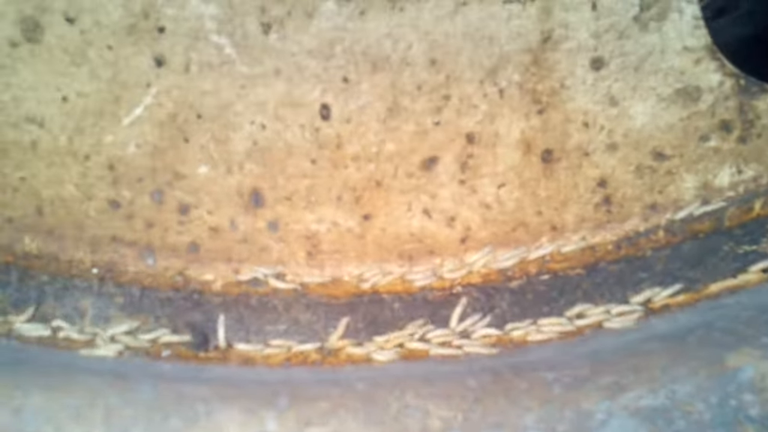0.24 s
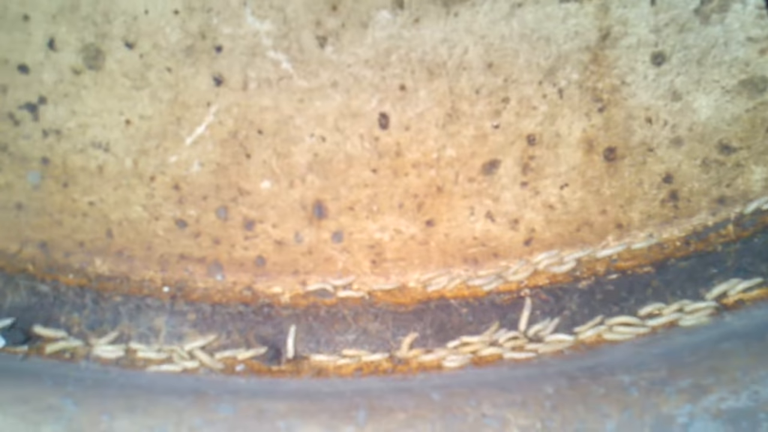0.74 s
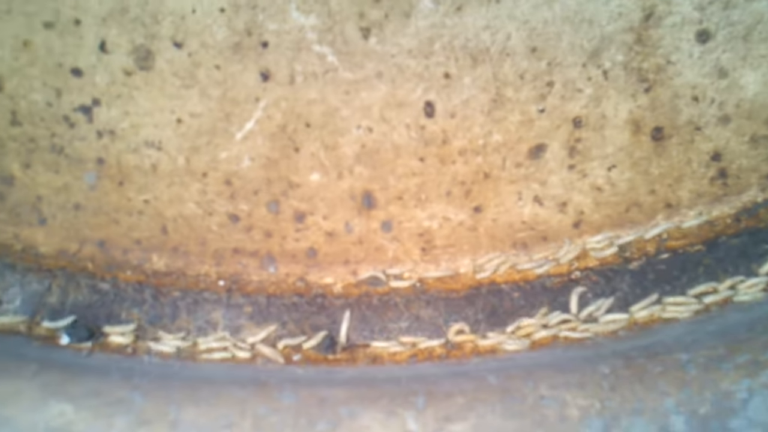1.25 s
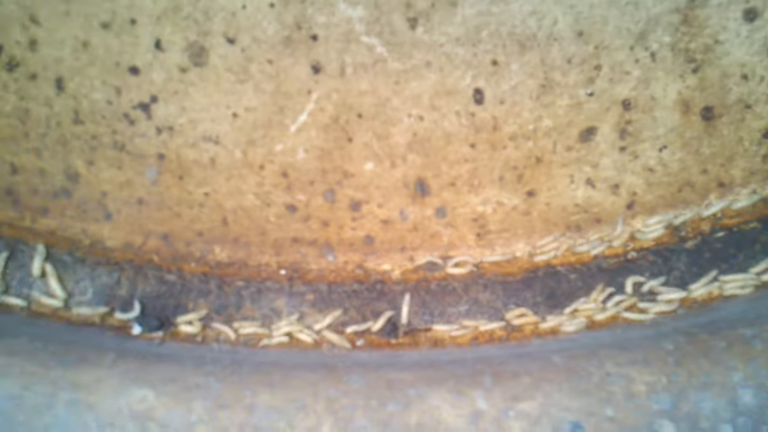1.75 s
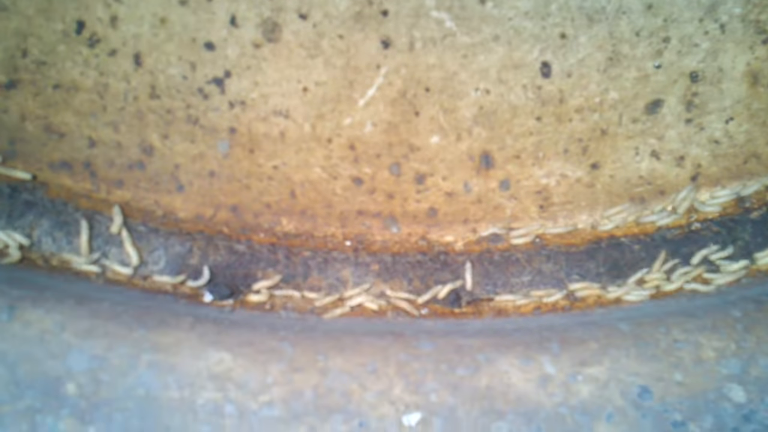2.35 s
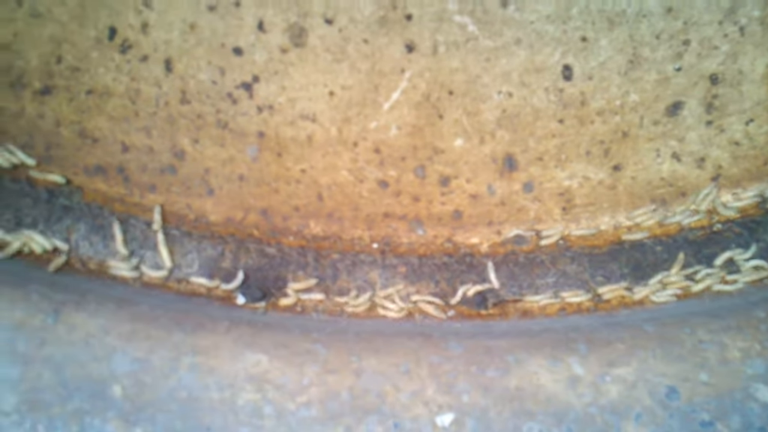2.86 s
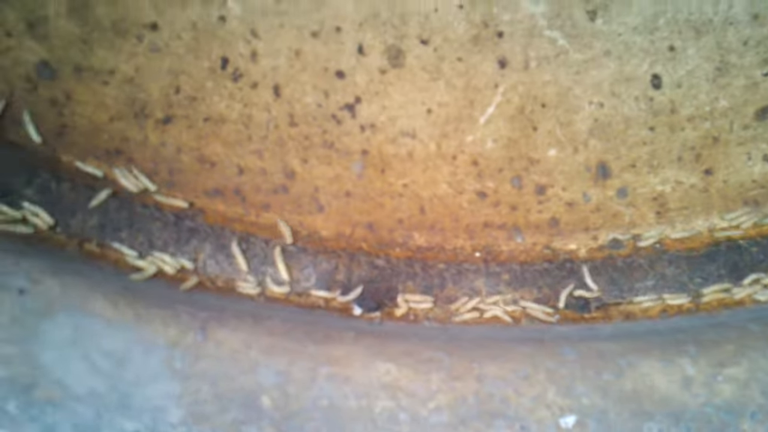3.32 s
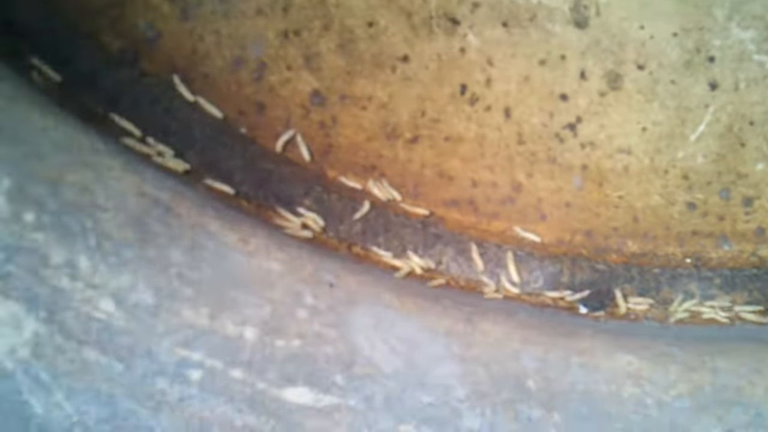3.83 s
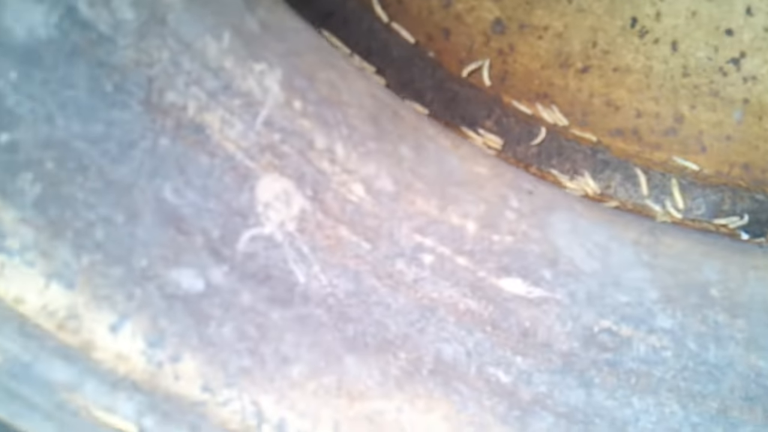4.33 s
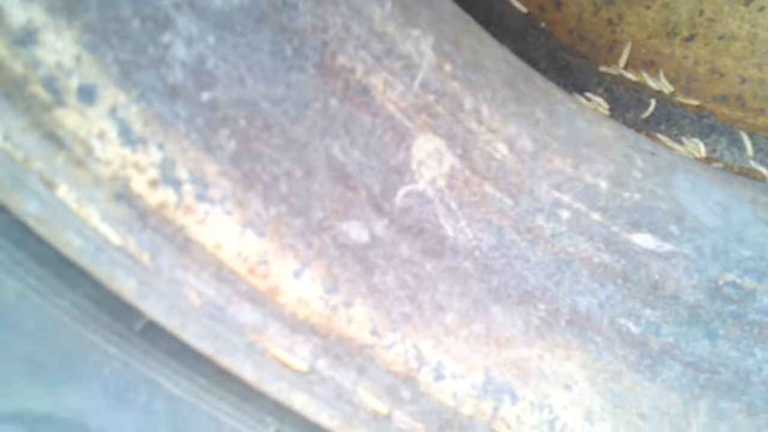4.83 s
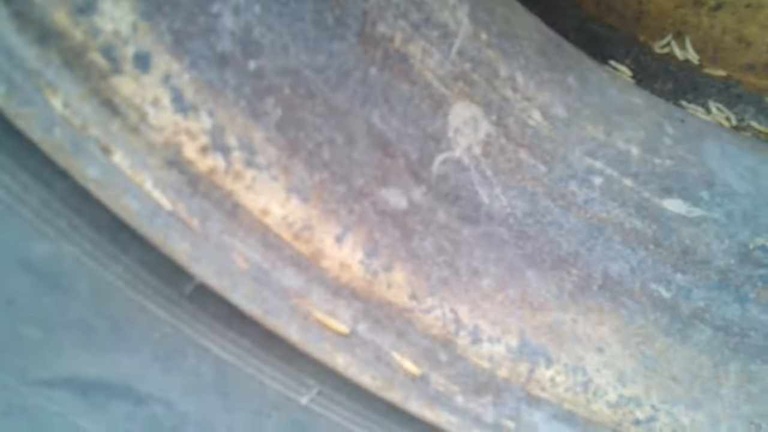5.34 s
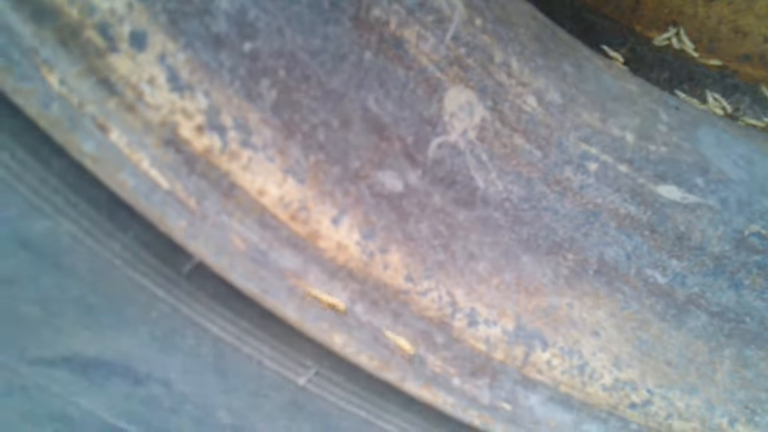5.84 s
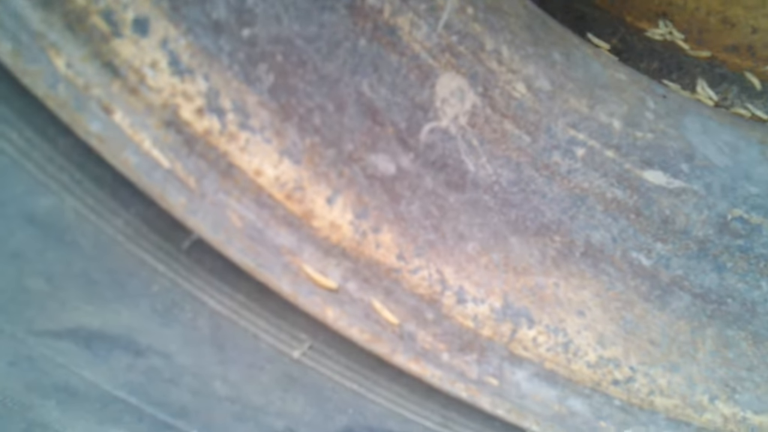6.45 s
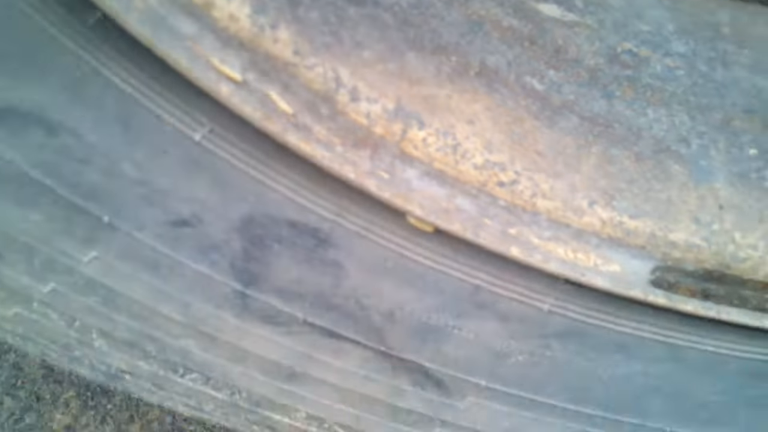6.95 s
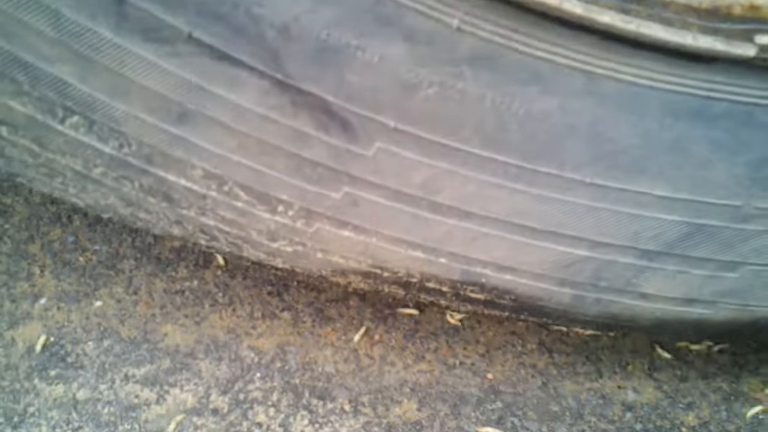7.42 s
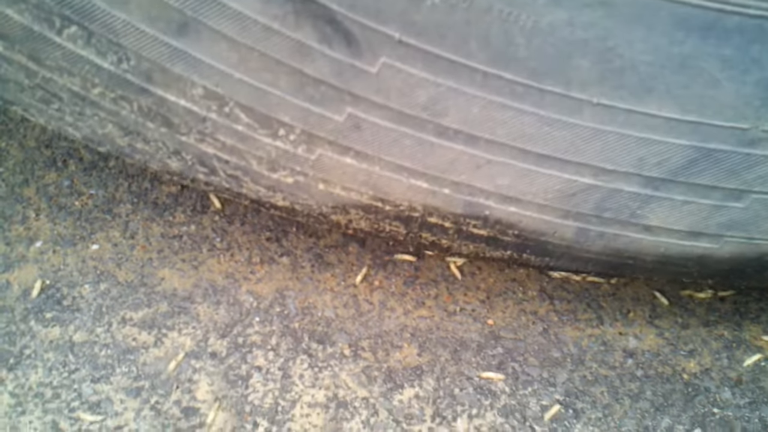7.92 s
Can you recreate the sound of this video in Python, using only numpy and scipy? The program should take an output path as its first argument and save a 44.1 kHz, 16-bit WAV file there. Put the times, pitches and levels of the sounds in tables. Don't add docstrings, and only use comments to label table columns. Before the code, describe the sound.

A large diesel engine rattles at idle outdoors; after faint air hisses and a short squeal, a thud brings in a loud, windy cooling fan roar.

```python
import sys
import numpy as np
from scipy import signal
from scipy.fft import rfft, irfft, next_fast_len
from scipy.io import wavfile
from scipy.ndimage import map_coordinates

SR = 44100
rng = np.random.default_rng(int(sys.argv[2]) if len(sys.argv) > 2 else 0)


def level_to_linear(level):
    exponent = np.asarray(level, float) / 20
    return 10 ** exponent


def bounce(signal):
    frames = np.transpose(np.atleast_2d(signal))
    limited = np.clip(frames, -1, 1)
    pcm = np.round(limited * 32767).astype(np.int16)
    wavfile.write(sys.argv[1], SR, pcm)


N = 360738

DRAG_S, GRIP_S, THUD_S = 1.115, 1.335, 1.351
# (time [s], speed [engine cycles per s])
SPEED = [
    (0, 8.295),
    (1.2, 8.292),
    (1.7, 8.27),
    (2.3, 8.35),
    (2.9, 8.325),
    (3.5, 8.305),
    (4.2, 8.298),
    (8.18, 8.295),
]


def unit(x):
    return x / np.sqrt(np.mean(x ** 2, axis=-1, keepdims=True) + 1e-20)


def along(points, hz):
    f, *cols = np.transpose(points)
    return [np.interp(np.log(hz + 1), np.log(f + 1), c) for c in cols]


def curves(rows):
    s, *cols = np.transpose(rows)
    return [np.interp(np.arange(N) / SR, s, c) for c in cols]


def since(s):
    return np.maximum(np.arange(N) / SR - s, 0)


def spin_up(s, lack_db, tau):
    return -lack_db * np.exp(-since(s) / tau)


def wobble(rate):
    return map_coordinates(rng.standard_normal(1600), [np.arange(N) * rate / SR])


def filtered(x, response):
    m = next_fast_len(N + 8192)
    return irfft(rfft(x, m) * response(np.fft.rfftfreq(m, 1 / SR)), m)[..., :N]


def above(hz, edge_hz):
    return 1 - 1 / (1 + (hz / edge_hz) ** 24)


def tone(hz, db, lag):
    phase = 2 * np.pi * np.cumsum(hz) / SR
    half = np.pi * hz * lag / SR
    return np.sqrt(2) * level_to_linear(db) * np.array([np.cos(half) * np.cos(phase), -np.sin(half) * np.sin(phase)])


def heard(pair, spectrum, waves, ports):
    def response(hz):
        db = along(spectrum, hz)[0]
        for centre, width, wave_db in waves:
            db = db + wave_db / (1 + (2 * (hz - centre) / width) ** 2)
        side_db, lead, tied = along(ports, hz)
        tied = np.clip(tied, 0, 1)
        gain = level_to_linear(db) * np.sqrt(SR / 2) * (hz > 12)
        follows = level_to_linear(side_db) * tied * np.exp(1j * lead)
        stands_alone = level_to_linear(side_db) * np.sqrt(1 - tied ** 2)
        return gain * np.array([np.ones_like(hz), follows, stands_alone])

    total, tied, loose = filtered(pair[[0, 0, 1]], response)
    return np.array([total, tied + loose])


def rattle(turn, steady):
    size, count = 8192, 500
    pattern = irfft(rfft(rng.standard_normal((2, size)))[:, :count], size)
    pattern = unit(pattern) * np.sqrt(count * 8.3 / (SR / 2))
    where = [turn % 1 * size]
    repeat = np.array([map_coordinates(p, where, order=1, mode="grid-wrap") for p in pattern])
    angle = 2 * np.pi * turn
    knock = .05 * np.cos(angle) + .04 * np.cos(2 * angle + 1) + .015 * np.cos(3 * angle)
    knock = knock + .015 * np.cos(6 * angle)
    noise = rng.standard_normal((2, N))
    noise = noise + filtered(knock * noise, lambda hz: 1 - .6 * above(hz, 3800))
    repeat = filtered(repeat, lambda hz: np.sqrt(steady(hz)))
    return repeat + filtered(noise, lambda hz: np.sqrt(1 - steady(hz)))


# (time [s], place [0 inner rim, 1 rim lip, 2 tyre wall])
DRIFT = [(0, 0), (3.0, 0.28), (3.4, 0.25), (3.7, .5), (4.0, 0.84), (4.3, .95), (4.7, 1.05), (5.5, 0.98),
         (6.2, 1.05), (6.9, 1.3), (7.15, 1.3), (7.45, 1.8), (8.18, 2.05)]


def at_place(rows):
    p, *cols = np.transpose(rows)
    return [np.interp(curves(DRIFT)[0], p, c) for c in cols]


# (time [s], level [dB])
SWELLS = [(1.72, -3), (2.2, 5), (2.64, -2), (3.1, 3.5), (3.33, -4), (3.8, 2.5), (4.15, 0), (4.42, -1),
          (4.95, -1), (5.15, 2.5), (5.65, 2.5), (6.36, 1.5), (6.9, 2.5), (7.4, 0), (8.2, 5)]
# (time [s], level lost [dB])
STALLS = [
    (1.9, 4.1),
    (2.72, 2.6),
    (3.4, 10.6),
    (4.54, 4.6),
    (5.371, 2.3),
    (6.049, 2.9),
]


def inflow_swing_db():
    t = np.arange(N) / SR
    swing = spin_up(GRIP_S, 1.6, 0.49)
    for s, db in SWELLS:
        swing = swing + db * np.exp(-((t - s) / 0.18) ** 2)
    onset_s, heal_s = 0.015, 0.13
    for s, db in STALLS:
        swing = swing - db * np.clip(since(s) / onset_s, 0, 1) * np.exp(-since(s + onset_s) / heal_s)
    return swing


# (frequency [Hz], level [dB per Hz])
ROAR = [
    [(40, -85.9), (70, -59), (105, -49), (150, -40.5), (200, -48), (260, -59), (400, -65.5), (700, -68),
     (1900, -78), (2900, -86.5), (4700, -99.6), (6500, -99), (8800, -99.9), (13900, -109.2)],
    [(40, -73), (70, -60), (105, -49.5), (150, -40), (200, -53.5), (260, -64.5), (400, -61.5), (700, -67.5),
     (1900, -73.5), (2900, -79.5), (4700, -90), (6500, -93), (8800, -93), (13900, -100.9)],
    [(40, -74.0), (70, -60), (105, -50.5), (150, -41), (200, -54.5), (260, -66.5), (400, -60.5),
     (700, -68.5), (1900, -77.5), (2900, -79.5), (4700, -92), (6500, -92), (8800, -93.5), (13900, -102.3)],
]
# (frequency [Hz], width [Hz], level [dB])
ROAR_WAVES = [
    [(338, 12, -9), (365, 18, -22), (433, 33, -3), (544, 66, -1.5), (910, 10, 3), (1300, 110, 8),
     (1450, 86, -27), (1602, 62, -17), (1700, 72, 1), (2580, 130, -3), (3100, 200, 0.5), (3250, 80, 6),
     (1684, 190, 11), (2030, 68, -1), (2224, 110, 9), (3360, 460, 3)],
    [(253, 9.7, -22), (287, 46, 8), (515, 33.4, -14.5), (539, 55, 10.5), (345, 26, 1.5), (712, 24, 6),
     (830, 37, -23), (935, 37, 8.5), (980, 27, 3), (1100, 45, -2.5), (1107, 90, -7), (1222, 56, -13.5),
     (1314, 63, 6.5), (1362, 58, -17.5), (1536, 100, -8), (1730, 72, -12), (1905, 78, 1.5), (2050, 94, 1.5),
     (2460, 120, 1), (2960, 150, -4), (3190, 200, 2.5), (3870, 780, -7.5), (4150, 50, 1), (4420, 300, -3)],
    [(238, 12, -14), (298, 17, 9.5), (339, 23, 8), (691, 36, 14.5), (379, 18, 2), (480, 30, -0.5),
     (850, 32, -2), (1215, 88, -10), (1340, 80, 0.5), (1566, 23, 10.5), (1680, 91, -14), (2050, 62, 10.5),
     (2340, 130, 4), (2480, 120, 1), (2950, 200, -3.5), (3180, 120, 4), (3740, 380, -5), (4280, 150, -6)],
]
# (frequency [Hz], width [Hz], level [dB])
EDGE_WAVES = [(292, 23, -1.5), (345, 32, -9), (456, 25, -1.5), (497, 34, -8), (620, 60, -4), (850, 70, -10),
              (712, 26, 8), (880, 40, -18), (957, 50, 7), (1350, 120, -6), (1720, 200, 0.5),
              (1960, 300, -4), (3100, 100, 4.5), (3450, 1500, 1), (3840, 220, -4)]
# (frequency [Hz], width [Hz], level [dB])
SHROUD = [(127.4, 9.4, -3), (137, 5.6, 3.5), (147.3, 16.6, -2.5), (168, 12, 2.5), (198, 14, 0),
          (457.2, 20, 9)]
# (frequency [Hz], level [dB], lead [rad], share tied to the sum [0-1])
RIM_PORTS = [(60, -25.2, 1.1, 0.84), (110, -19.8, 0.6, 0.75), (170, -23.7, 1.7, 0.73),
             (220, -23.2, -1.1, 0.44), (270, -12.8, -1.2, 0.38), (340, 2.0, 1.5, 0.49),
             (450, -4.6, 0.2, 0.64), (620, -6.8, 1.3, 0.67), (900, -4.2, 2.4, 0.77), (1400, 4.2, 1.7, 0.62),
             (1800, 2.5, 3.2, 0.88), (2250, -2.7, 4.1, 0.48), (3200, -3.6, 7.0, 0.31),
             (4700, 0.0, 7.3, 0.2)]
LIP_PORTS = [(60, -24.0, 1.1, 0.84), (110, -20.4, 1.3, 0.61), (170, -16.4, 2.4, 0.82),
             (220, -13.0, 4.0, 0.66), (270, -10.5, 5.9, 0.55), (340, -9.2, 6.8, 0.9),
             (450, -5.4, 7.6, 0.84), (620, -5.1, 7.4, 0.91), (900, -3.6, 8.0, 0.84), (1400, 8.2, 8.6, 0.55),
             (1800, 2.6, 9.9, 0.78), (2250, -5.3, 10.3, 0.58), (3200, -1.0, 7.2, 0.72),
             (4700, 0.0, 6.6, 0.2)]
TYRE_PORTS = [(60, -23.4, 1.1, 0.83), (110, -19.1, 1.0, 0.64), (170, -16.2, 2.2, 0.75),
              (220, -9.8, 4.6, 0.46), (270, -8.3, 6.8, 0.79), (340, -8.9, 7.1, 0.9), (450, -5.5, 7.7, 0.87),
              (620, -4.1, 7.6, 0.91), (900, 0.7, 7.7, 0.84), (1400, 4.7, 9.2, 0.75),
              (1800, 4.6, 10.3, 0.68), (2250, -3.4, 10.4, 0.75), (3200, -3.6, 7.4, 0.66),
              (4700, 0.0, 6.6, 0.2)]
PLACES = (0, .5, 1, 2)
# (place [0-2], rattle [dB], air rush [dB], hiss [dB])
PLACE_LEVELS = [
    (0, 0.8, -1.27, 4.5),
    (.5, -2, 0.5, 2.5),
    (1, -5, 0.46, 1),
    (2, -2, 1.24, 2.5),
]


def roar(turn):
    white = rattle(turn, lambda hz: .55 * np.exp(-np.log((hz + 1) / 1100) ** 2 / .7))
    rim, lip, tyre = ROAR
    rim_waves, lip_waves, tyre_waves = ROAR_WAVES
    looks = [heard(white, rim, rim_waves + SHROUD, RIM_PORTS),
             heard(white, rim, EDGE_WAVES + SHROUD, RIM_PORTS),
             heard(white, lip, lip_waves + SHROUD, LIP_PORTS),
             heard(white, tyre, tyre_waves + SHROUD, TYRE_PORTS)]
    place = np.clip(curves(DRIFT)[0], 0, 2)
    mix = 0
    for k, look in enumerate(looks):
        mix = mix + np.interp(place, PLACES, np.arange(len(PLACES)) == k) * look
    boom = filtered(mix, lambda hz: 1 - above(hz, 180))
    hiss = filtered(mix, lambda hz: above(hz, 3900))
    rush = mix - boom - hiss

    swing_db, gust = inflow_swing_db(), wobble(5.6)
    _, rush_db, hiss_db = at_place(PLACE_LEVELS)
    boom_gain = np.clip(since(THUD_S) / .04, 0, 1) * level_to_linear(swing_db - 1)
    rush_db = rush_db + spin_up(DRAG_S, 26, 0.19) + 0.041 * swing_db + gust + 0.82 * wobble(17)
    hiss_db = hiss_db + spin_up(DRAG_S, 21, 0.27) + 0.34 * gust + 0.74 * wobble(21)
    return boom_gain * boom + level_to_linear(rush_db) * rush + level_to_linear(hiss_db) * hiss


# (time [s], hum [dB], overtone [dB])
BLADE_LOAD = [(1.65, -33, -51), (1.85, -34, -42), (2.05, -33.5, -50), (2.25, -32.5, -50.5),
              (2.45, -34, -59), (2.7, -40, -54), (2.88, -30, -46), (3.1, -40, -45), (3.28, -31.5, -41.5),
              (3.55, -39.5, -51), (3.85, -33.5, -47.5), (4.3, -35, -49.5), (4.45, -38, -52),
              (5.1, -37.5, -40), (5.85, -42.5, -44), (6.75, -39.5, -39), (7.5, -43.5, -41.5),
              (8.18, -43, -36.5)]
PLACE_BLADES = [
    (0, -3, 3),
    (.6, -2, 6.1),
    (1, -11, 14),
    (2, -12, 14),
]


def blades():
    hum_db, over_db = curves(BLADE_LOAD)
    hum_lag, over_lag = at_place(PLACE_BLADES)
    hum_db = hum_db + 5 + spin_up(GRIP_S, 48, 0.044) + 1.17 * wobble(14)
    over_db = over_db + spin_up(GRIP_S, 56, 0.11) + 2 * wobble(13)
    blades_per_cycle, slip, slip_s = 26.27, .06, .22
    hz = blades_per_cycle * curves(SPEED)[0] * (1 - slip * np.exp(-since(GRIP_S) / slip_s))
    hz = hz + 0.61 * wobble(10.1)
    return tone(hz, hum_db, hum_lag) + tone(2 * hz + 0.48 * wobble(12), over_db, over_lag)


def thud():
    hold_s, fade_db_per_s = .07, 250
    gain = np.clip(since(THUD_S) / .005, 0, 1) * level_to_linear(-fade_db_per_s * since(THUD_S + hold_s))
    return gain * tone(np.full(N, 176), -23.5, 3)


# (frequency [Hz], port lag [samples])
SINGING = [
    (173, 5.3),
    (150.5, 2.8),
    (130, 2.5),
]
# (time [s], length [s], level [dB])
BURSTS = [
    [(1.74, 0.14, -25.5), (2.28, 0.16, -28), (2.63, .09, -24.5), (3.1, 0.092, -34), (3.29, 0.11, -19.5),
     (4.0, 0.19, -31.5), (4.49, .12, -25), (5.2, 0.085, -27), (5.57, 0.1, -27), (5.8, 0.14, -28),
     (6.04, 0.075, -26.5), (6.34, 0.11, -25.5), (6.78, 0.066, -28), (6.94, 0.088, -24.5),
     (7.15, 0.047, -24), (7.65, 0.092, -31), (7.9, 0.14, -28), (8.15, 0.069, -24)],
    [(1.84, 0.06, -29), (2.13, .12, -30), (2.64, 0.12, -29), (3.07, 0.076, -28), (3.74, .07, -30),
     (3.96, 0.085, -27), (4.15, 0.052, -31), (4.34, 0.071, -22), (4.94, 0.051, -21.5), (5.25, 0.059, -28),
     (5.66, 0.17, -24), (6.33, 0.13, -27.5), (6.85, .1, -38), (7.15, 0.082, -29), (7.83, .12, -28),
     (8.05, .07, -26)],
    [(2.15, 0.073, -30), (2.9, 0.08, -31.5), (3.78, .1, -34), (5.33, .08, -31), (5.65, 0.063, -37),
     (6.44, 0.059, -32), (7.0, 0.14, -32.5), (7.35, .1, -33), (8.12, 0.12, -28)],
]


def shroud():
    t, out = np.arange(N) / SR, 0
    for (hz, lag), bursts in zip(SINGING, BURSTS):
        gain = sum(level_to_linear(db) * np.exp(-((t - s) / length) ** 2) for s, length, db in bursts)
        out = out + gain * tone(hz + 1.54 * wobble(5.1) + 2.22 * wobble(16), 2.2 * wobble(19), lag)
    return out


# (time [s], length [s], pitch [Hz], glide [Hz per s], level [dB])
SLIPS = [
    (.918, 0.049, 8470, -600, -58),
    (.966, 0.052, 8560, -3600, -58),
    (1.016, 0.05, 8400, 900, -52),
    (1.06, 0.052, 8370, -700, -52),
    (1.13, 0.035, 8300, -600, -54.5),
    (1.17, .035, 8320, -100, -66),
    (1.21, .022, 8300, -200, -63),
]


def squeal():
    t = np.arange(N) / SR
    hz, gain = np.full(N, float(SLIPS[0][2])), np.zeros(N)
    edge_s = 0.0071
    for s, length, start_hz, glide, db in SLIPS:
        hz = np.where(t >= s, start_hz + glide * np.minimum(t - s, length), hz)
        gain += level_to_linear(db) * np.clip(np.minimum(t - s, s + length - t) / edge_s, 0, 1)
    return hz, gain


# (time [s], hold [s], level [dB], swell [dB per s], fade [dB per s])
PUFFS = [
    (.28, .2, -67, 33, 130),
    (1.1, 0.13, -60, 64, 36),
]
# (time [s], pitch [Hz], length [s], level [dB])
SQUEAKS = [
    (.07, 8700, .015, -67),
    (.1, 7950, .012, -64),
    (.15, 7600, .015, -66),
    (.205, 6650, .014, -65),
    (.4, 6850, .016, -70),
    (.425, 8800, .02, -69),
    (.505, 8700, .035, -64),
]


def clutch():
    t = np.arange(N) / SR
    air = level_to_linear(-89) * (t < GRIP_S)
    for s, hold, db, swell, fade in PUFFS:
        air = air + level_to_linear(db - swell * np.maximum(s - t, 0) - fade * since(s + hold))
    white = rng.standard_normal((2, N))
    hiss = unit(filtered(white, lambda hz: 1 / (1 + ((hz - 7900) / 1200) ** 4)))
    out = air * level_to_linear(3.1 * wobble(29.8)) * hiss

    for s, hz, length, db in SQUEAKS:
        squeak = tone(hz + 70 * wobble(150), db + 3 * wobble(97), 1.2)
        out += np.exp(-((t - s) / length) ** 2) * squeak

    hz, slipping = squeal()
    chatter_phase = 2 * np.pi * np.cumsum(80 + 15 * wobble(34)) / SR
    chatter_db = 3 * np.cos(chatter_phase) + 2.9 * wobble(89.9) - 2
    out += slipping * tone(hz + 22 * wobble(131), chatter_db, 0.66)

    thin = unit(filtered(rng.standard_normal((2, N)), lambda hz: above(hz, 9500)))
    return out + level_to_linear(-57) * np.exp(-((t - .165) / 0.041) ** 2) * thin


def effort():
    idle_per_s, droop, load_s = 8.295, 11.5, 0.13
    nearing_db = 2 * np.minimum(np.arange(N) / SR - GRIP_S, 0)
    shed = droop * np.maximum(curves(SPEED)[0] - idle_per_s, 0)
    load = (1 - np.exp(-since(GRIP_S) / load_s)) * (1 - shed)
    return at_place(PLACE_LEVELS)[0] + nearing_db, load


# (multiple of the engine cycle, idle level [dB], loaded level [dB],
# port difference [dB], its lead [rad])
ORDERS_CLEAN = [(6, -51, -46, -27, 1.6), (9, -49, -43.5, -23, .9), (12, -52, -46, -19, 1.8),
                (13, -49, -42, -20, 1.2), (15, -41, -35, -18, 1), (18, -49, -37, -22, 2.4),
                (20, -51, -45, -24, 1.8), (21, -48, -40, -19, 2.2), (24, -51, -48, -22, 2),
                (26, -48, -48, -22, -2), (30, -52, -53, -14, 3.4), (42, -66, -57, -6, 1),
                (84, -64, -56, -3, 1.4), (100, -62, -61, -3, 1.4), (104, -62, -60, -6, 1),
                (120, -66, -60, -6, 1), (96, -70, -60, -3, 1.9), (108, -68, -59, -7, .5),
                (118, -68, -56, -2, 2.2), (174, -76, -63, 5, 2.4), (186, -76, -62, 4, -2.7),
                (192, -75, -67, 3.5, -3), (204, -72, -65, 0, 2.7), (224, -75, -62, 2, -3),
                (228, -75, -62, 1, -2.7), (240, -75, -63, -2, -2.3)]
# (frequency [Hz], level [dB per Hz])
BLOCK = [(40, -65), (70, -75), (105, -55), (150, -56.5), (200, -66.5), (260, -64.5), (400, -83), (700, -75),
         (1900, -82), (2900, -90), (4700, -100.5), (6500, -100.8), (8800, -99.6), (13900, -106.4)]
# (frequency [Hz], width [Hz], level [dB])
BLOCK_WAVES = [(250, 13, -5), (304, 16, -20), (428, 31, 11), (518, 19, -8), (568, 23, 6), (630, 25, -3),
               (780, 38, 5), (1118, 16, -2), (1205, 24, 11.5), (1284, 53, 5.5), (1417, 45, 11.5),
               (1436, 47, -11.5), (1610, 40, -7), (1647, 45, 3.5), (1840, 51, 3), (2160, 80, -3.5),
               (2186, 50, 7), (2500, 130, 3.5), (2840, 200, 1.5), (2420, 140, -7)]
# (frequency [Hz], level [dB], lead [rad], share tied to the sum [0-1])
BLOCK_PORTS = [(60, -25.6, 0.9, 0.81), (110, -18.6, 0.9, 0.87), (170, -20.0, 0.9, 0.66),
               (220, -21.4, 2.4, 0.28), (270, -14.7, 3.6, 0.55), (340, -1.2, 2.8, 0.76),
               (450, -2.1, 4.6, 0.3), (620, -6.5, 6.7, 0.68), (900, -4.0, 8.2, 0.73),
               (1400, 1.5, 7.4, 0.54), (1800, 2.5, 9.0, 0.7), (2250, 1.9, 10.2, 0.44),
               (3200, -4.0, 10.5, 0.27), (4700, 0.0, 8.4, 0.2)]


def engine(turn):
    db, load = effort()
    push_db = 0.35 * load * inflow_swing_db()
    white = rattle(turn, lambda hz: .6 / (1 + (hz / 1500) ** 4))
    out = level_to_linear(db) * heard(white, BLOCK, BLOCK_WAVES, BLOCK_PORTS)
    for order, idle_db, loaded_db, side_db, lead in ORDERS_CLEAN:
        stirred = 12 < order < 30
        phase = 2 * np.pi * (order * turn + rng.random()) + (0.21 + 0.43 * load * stirred) * wobble(5.4)
        level_db = idle_db + load * (loaded_db - idle_db)
        level_db = level_db + stirred * (push_db + 0.85 * load * wobble(4.5))
        pair = np.array([np.cos(phase), level_to_linear(side_db) * np.cos(phase + lead)])
        out += np.sqrt(2) * level_to_linear(level_db) * pair
    return out


def scene():
    turn = np.cumsum(curves(SPEED)[0] * (1 + .0005 * wobble(3))) / SR
    total, difference = roar(turn) + blades() + thud() + shroud() + clutch() + engine(turn)
    return np.array([total + difference, total - difference])


def band_limit(x):
    return signal.sosfilt(signal.butter(12, 13940, fs=SR, output="sos"), x)


def record(dry):
    def cross(hz):
        share = 1 - .63 * above(hz, 4250) - .13 * above(hz, 7000) + .13 * above(hz, 9200)
        share = share - .18 * above(hz, 12300) - .15 * above(hz, 13300)
        delay = 17
        return share * np.exp(-2j * np.pi * hz * delay / SR)

    aimed = filtered(dry - filtered(dry[::-1], cross), lambda hz: hz < 13950)
    offset = np.outer([-1, 1], np.linspace(.0016, .0025, N))
    return band_limit(aimed + offset)


dry = scene()
out = record(dry)
bounce(out)
```